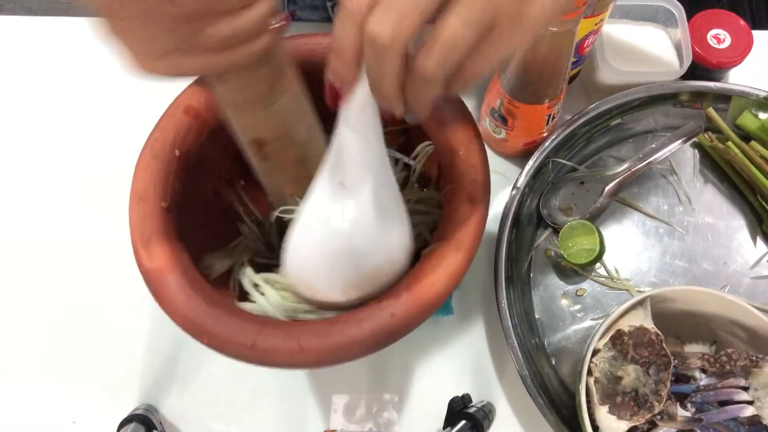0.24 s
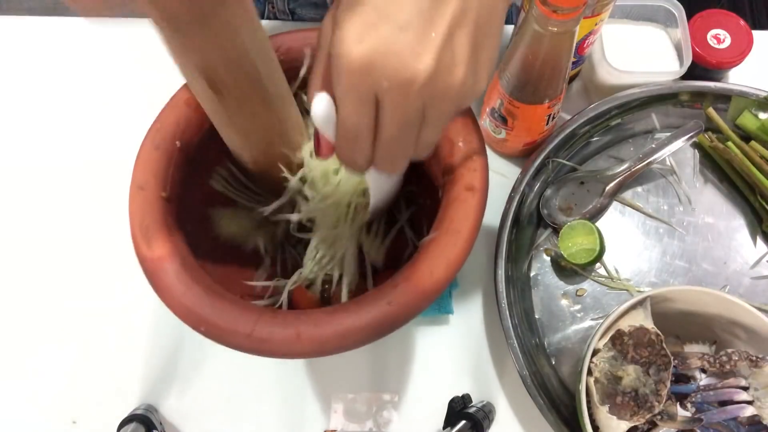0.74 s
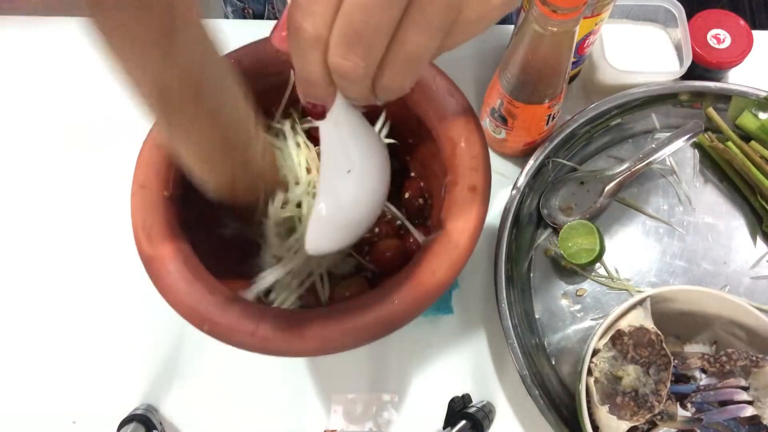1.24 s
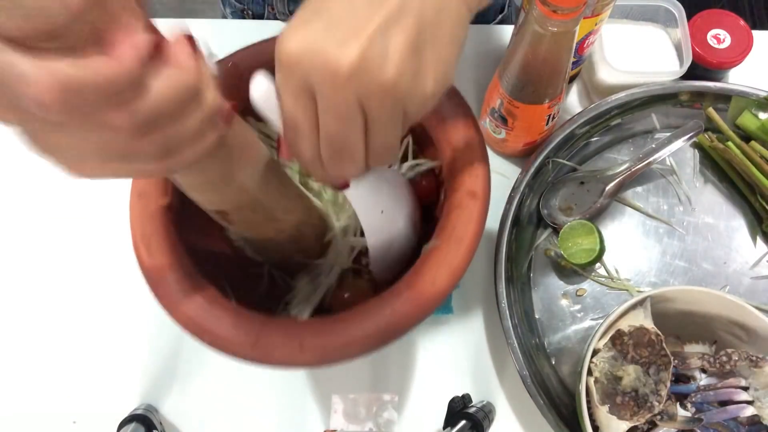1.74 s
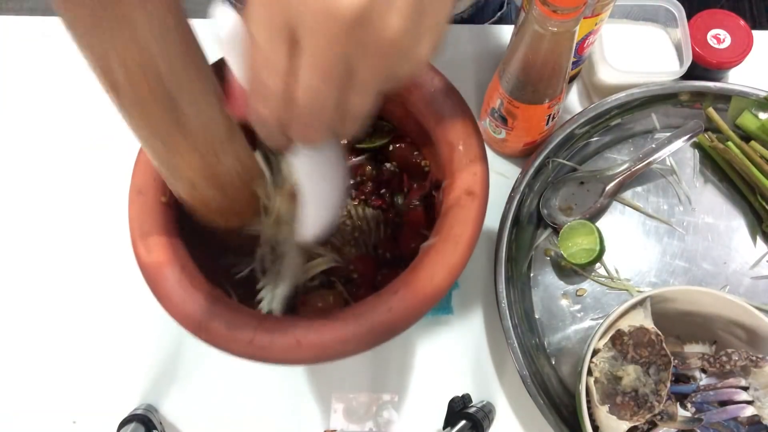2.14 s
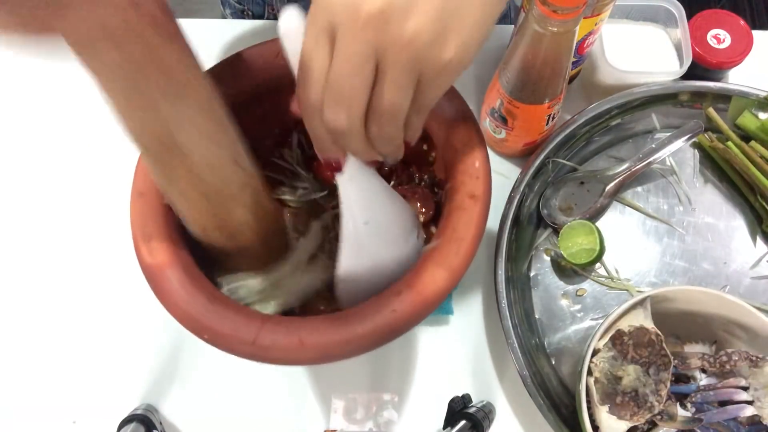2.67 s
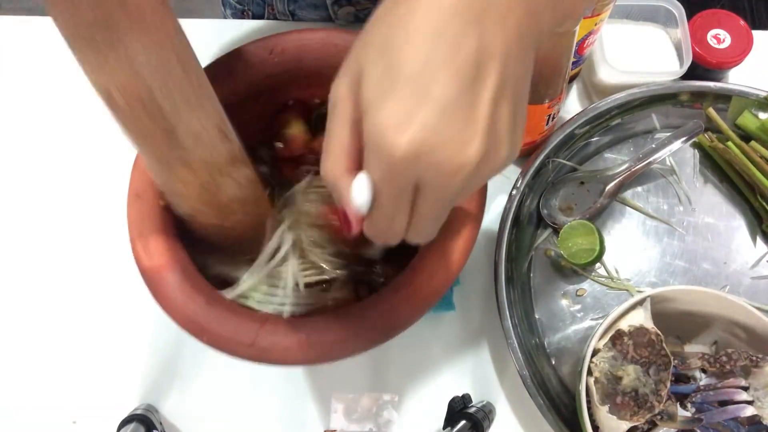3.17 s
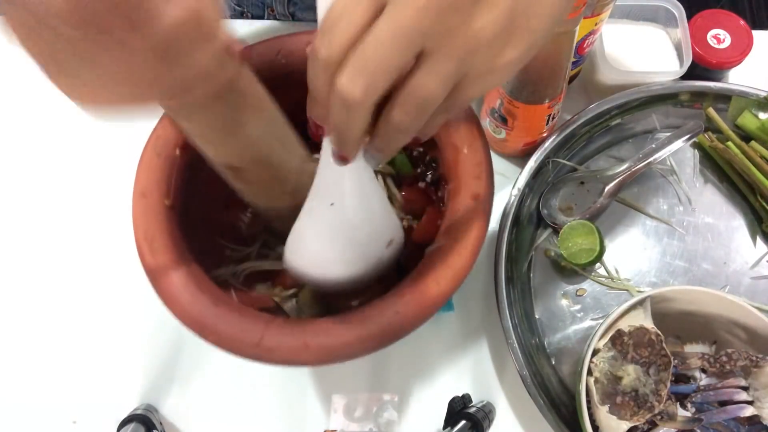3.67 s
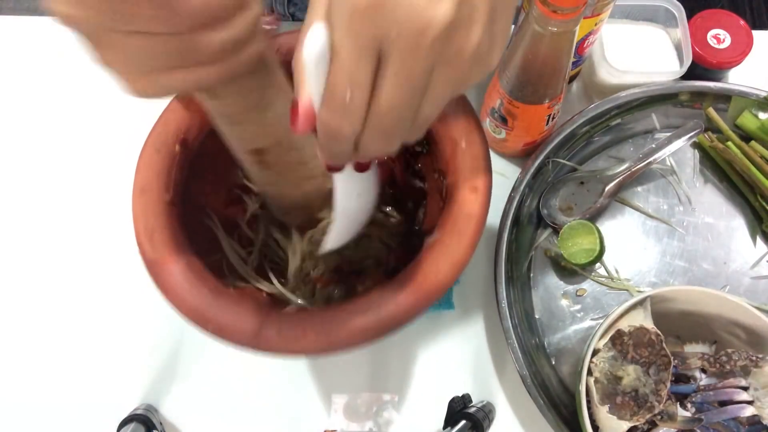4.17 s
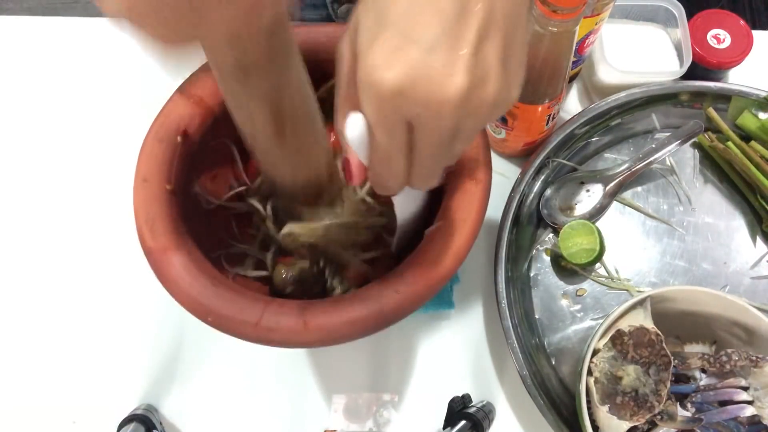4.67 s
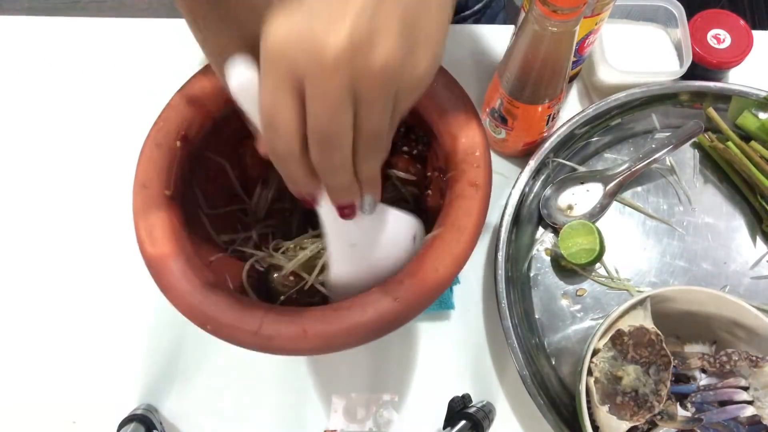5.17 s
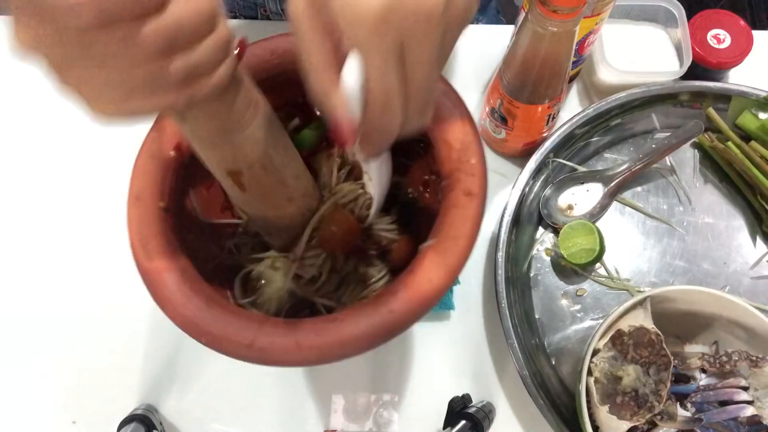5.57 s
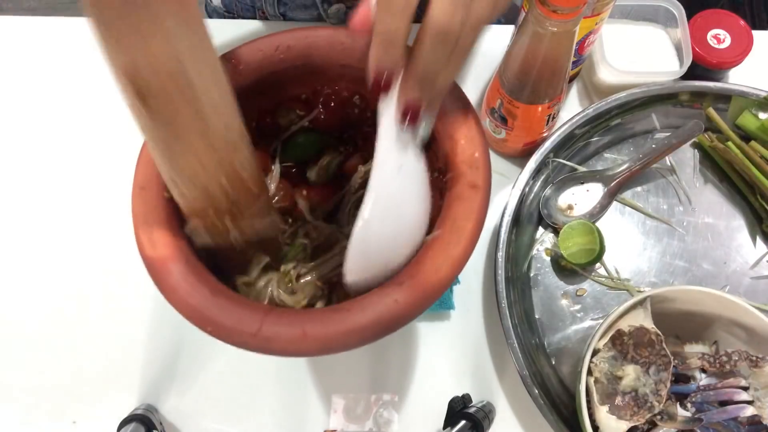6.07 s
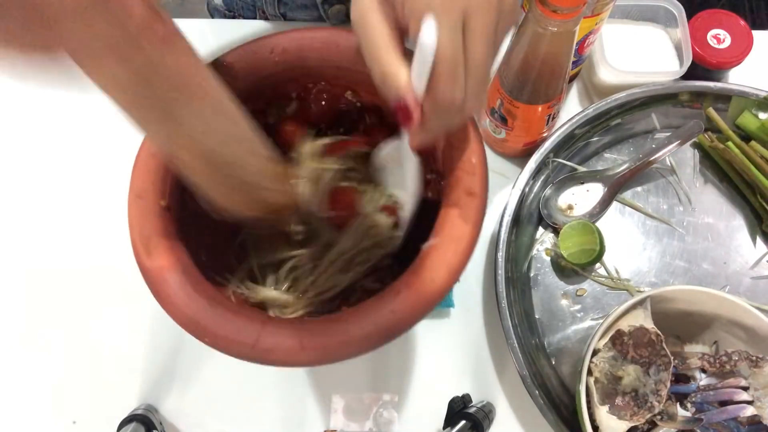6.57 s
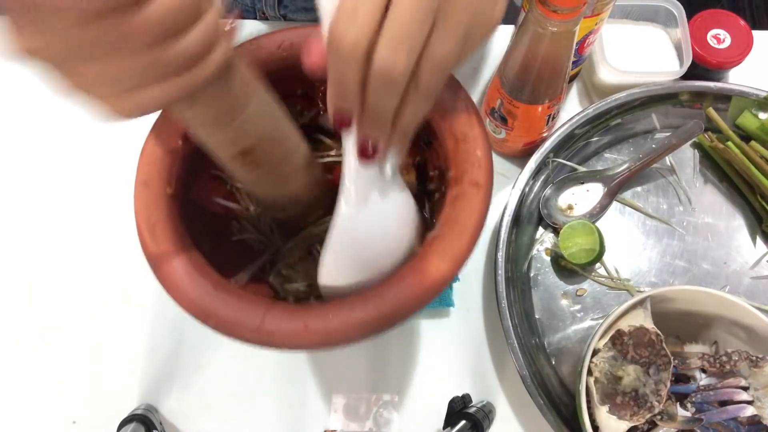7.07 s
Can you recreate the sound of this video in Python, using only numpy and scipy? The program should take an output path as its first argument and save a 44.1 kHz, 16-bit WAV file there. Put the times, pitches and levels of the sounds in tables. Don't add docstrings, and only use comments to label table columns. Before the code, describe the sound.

A close microphone hears a wooden pestle pounding wet shredded vegetable in a clay mortar, roughly three uneven pounds a second, each a swelling crunch with fine fizz and juicy squash. A spoon clack opens at 0.3 s. Rim knocks follow at 0.5, 0.8 and 1.1 s, the loudest at 1.7 s, making the clay ring around 1.1 kHz until touches damp it. A hollow knock comes at 2.25 s, a soft woody thud at 2.7 with little scrapes and squeals, and a firm knock at 3.3. From 3.5 to 4.4 s mostly squelchy pounding and light taps remain. Hard plastic clacks strike at 4.45, 5.15 and 6.15 s, a duller one at 5.9, with brief chirping scrapes near 5.2. A ringing woody blow lands at 6.7, then a heavy crunch and closing clack at 7.1. Short kitchen reflections and steady low hum with a faint far motor lie behind.

```python
import sys
import numpy as np
from scipy import signal
from scipy.fft import rfft, irfft, next_fast_len
from scipy.io import wavfile
from scipy.ndimage import uniform_filter1d, map_coordinates

SR = 44100
rng = np.random.default_rng(int(sys.argv[2]) if len(sys.argv) > 2 else 0)


def wav_record(signal):
    frames = np.transpose(np.atleast_2d(signal))
    bounded = np.clip(frames, -1, 1)
    quanta = np.round(bounded * 32767).astype(np.int16)
    wavfile.write(sys.argv[1], SR, quanta)


def boost_factor(decibels):
    exponent = np.asarray(decibels, float) / 20
    return 10 ** exponent


N = 322395


def along(points, hz):
    f, v = np.transpose(points)
    return np.interp(np.log(hz + 1), np.log(f + 1), v)


def coloured(x, spectrum):
    m = next_fast_len(len(x) + 8192)
    gain = boost_factor(along(spectrum, np.fft.rfftfreq(m, 1 / SR)))
    y = irfft(rfft(x, m) * gain, m)[:len(x)]
    return y / np.sqrt(np.mean(y ** 2))


def around(hz, wide, n):
    heap = [(hz / wide ** 7, -60), (hz / wide ** 3, -22), (hz / wide, -5), (hz, 0),
            (hz * wide, -5), (hz * wide ** 3, -22), (hz * wide ** 7, -60)]
    return coloured(rng.standard_normal(n), heap)


def above(x, hz):
    return signal.sosfilt(signal.butter(N=3, Wn=hz, btype="high", fs=SR, output="sos"), x)


def add(track, s, sound):
    part = track[round(s * SR):][:len(sound)]
    part += sound[:len(part)]


def rung(modes, t):
    luck_db = rng.normal(0, 1.5, len(modes))
    detune = rng.normal(0, .0007, len(modes))
    out = 0
    for (hz, db, t60), more_db, shift in zip(modes, luck_db, detune):
        out = out + boost_factor(db + more_db - 60 * t / t60) * np.sin(2 * np.pi * hz * (1 + shift) * t)
    return out


# (time [s], crunch level [dB], wetness [dB], fizz [dB], rise to gain 6 dB [s])
POUNDS = [(0.272, -38, -10, -13, .022), (0.888, -40.5, -5.5, -11, .027), (1.189, -38, 2, -11, .014),
          (1.495, -37, 3, -14, .026), (1.789, -38, -.6, -9.5, .025), (2.041, -39, -5, -12, .028),
          (2.531, -37.5, 1.5, -15, .022), (2.858, -41, -14, -11, .018), (3.094, -40.5, 3, -11, .025),
          (3.43, -39.5, -1.1, -11, .033), (3.688, -41, 2.5, -13, .034), (3.96, -38, 0, -7, .026),
          (4.229, -37, 1.1, -7, .02), (4.504, -38.5, 6, -5, .013), (5.068, -39, 5, -12, .017),
          (5.949, -41, 4, -10, .023), (6.012, -46, 9, -13, .0068), (6.526, -44, 3, -11, .009),
          (6.842, -36, 2, -9, .013), (7.121, -30, 0, -13, .008)]
# (time [s], crunch level
# [dB], wetness [dB], rise by 6 dB [s], fall by 6 dB [s])
STIRS = [(2.785, -38, -3, .005, .04), (6.46, -55, 3, .04, .03), (0.406, -50, -9, .029, .019),
         (0.607, -43, -8, .054, .031), (0.719, -55.5, -2.1, .07, .07), (1.245, -50.5, 2.1, .017, .041),
         (1.439, -48, -9, .01, .017), (1.618, -56, 1.1, .044, .0086), (2.063, -55, 11, .012, .013),
         (2.636, -56, 5.5, .022, .044), (2.83, -38, 1.5, .019, .045), (3.193, -54, 4, .018, .018),
         (4.018, -57, 13.5, .034, .013), (4.3, -59.5, 16, .039, .037), (4.606, -43, -11, .057, .024),
         (4.78, -42.5, -3, .012, .035), (4.919, -66, 14, .041, .02), (5.23, -55.5, 3, .018, .07),
         (5.316, -43, 3, .0084, .042), (5.43, -55.5, 2.1, .045, .068), (5.645, -44, 5, .014, .041),
         (6.258, -42, 0, .033, .032), (7.245, -51, -2, .015, .02)]
# (time [s], level [dB], wetness [dB])
RUSTLE = [(0, -48, -3), (.14, -68, 11), (.3, -50, 3), (.5, -47, 0), (1.2, -56, -3), (1.36, -68, 3),
          (1.6, -54, 0), (1.95, -52, -3), (2.4, -66, 3), (2.9, -51, 0), (4.25, -54, 0), (4.42, -61, 3),
          (5.27, -50, 0), (5.6, -60, 3), (6.1, -61, 3), (6.37, -50, -3), (6.7, -57, 4), (7.31, -46, -3)]


def pressure():
    def fizz_for(wet_db):
        return -10 - .5 * wet_db

    s, db, wet_db = np.transpose(RUSTLE)
    rustle_db = np.interp
    power = np.array([boost_factor(2 * rustle_db(np.arange(N) / SR, s, db - 6 + more))
                      for more in (0, fizz_for(wet_db), wet_db)])
    pound_fall_s = .014
    pounds = [(s, db, fizz_db, wet_db, rise, pound_fall_s) for s, db, wet_db, fizz_db, rise in POUNDS]
    stirs = [(s, db, fizz_for(wet_db), wet_db, rise, fall) for s, db, wet_db, rise, fall in STIRS]
    u = np.arange(-SR // 5, SR // 5) / SR
    for s, crunch_db, fizz_db, squash_db, rise, fall in pounds + stirs:
        away = np.abs(u) / np.clip(np.where(u < 0, rise, fall), .004, .07)
        swell = boost_factor(2 * (crunch_db - 7.25 * away ** 1.7))
        for row, more in zip(power, (0, fizz_db, squash_db)):
            add(row, s + u[0], boost_factor(2 * more) * swell)
    return np.sqrt(power)


def grains(rate, hz, octaves, cycles, spread_db, bed_db):
    when, pitch, size = rng.random((3, int(rate * N / SR)))
    f = np.minimum(hz * 2 ** (octaves * (2 * pitch - 1)), .4 * SR)[:, None]
    t = np.arange(int(np.clip(3 * cycles * SR / hz, 8, 400))) / SR
    tone = np.sin(2 * np.pi * f * t) * f * t * np.exp(-2 * f * t / cycles)
    strength = boost_factor(np.minimum(-spread_db * np.log(size + 1e-9), 18))[:, None]
    tone *= strength / np.linalg.norm(tone, axis=1, keepdims=True)
    at = (when * N).astype(int)[:, None] + np.arange(len(t))
    out = np.bincount(at.ravel(), tone.ravel(), N)[:N]
    return out / np.std(out) + boost_factor(bed_db) * rng.standard_normal(N)


# (pitch [Hz], level per Hz [dB])
CRUNCH = [(1500, -19), (2600, 3), (4000, 3.5), (6000, 1), (8000, -8.5), (12000, -46)]
# (pitch [Hz], level per Hz [dB])
FIZZ = [(4000, -18), (7000, 9.5), (10000, 5), (15750, 0), (16150, -58.5)]
# (pitch [Hz], level per Hz [dB])
SQUASH = [(250, -31), (450, -20.5), (600, 3.5), (800, -2), (1500, 2), (2400, 0), (3500, -9.5), (6000, -71)]


def crush():
    snags = map_coordinates(rng.standard_normal(N // 250 + 4), [np.arange(N) / 250])
    crunch = grains(rate=1700, hz=4226, octaves=.9, cycles=2.5, spread_db=5.5, bed_db=6.5)
    fizz = grains(rate=3000, hz=9340, octaves=.83, cycles=2.8, spread_db=4, bed_db=-2)
    squash = grains(rate=900, hz=1300, octaves=1.376, cycles=2.38, spread_db=2, bed_db=3)
    layers = [boost_factor(2.5) * coloured(crunch, CRUNCH),
              boost_factor(5) * coloured(fizz, FIZZ),
              boost_factor(2.5) * coloured(squash, SQUASH)]
    return boost_factor(2.24 * snags) * np.sum(pressure() * layers, axis=0)


def patchy(x, depth_db):
    z = signal.stft(x, nperseg=256)[2]
    field = uniform_filter1d(rng.standard_normal(z.shape), size=5, axis=0)
    field = uniform_filter1d(field, size=5, axis=1)
    gain = boost_factor(depth_db * field / np.std(field) - depth_db ** 2 / 9)
    return signal.istft(z * gain, nperseg=256)[1][:N]


# (pitch [Hz], level [dB], t60 [s])
HOLLOW = [(353, -25, .25), (410, -23, .3), (550, -11, .16), (610, -9, .07), (660, 0, .022), (840, -9, .025)]


def hollow(t):
    return rung(HOLLOW, t) + boost_factor(-11 - 60 * t / .12) * around(565, 1.26, len(t))


# (pitch [Hz], level [dB], t60 [s])
KNOCK = [(872, -4, .05), (960, -2, .025), (1303, 1, .022)]
# (time [s], peak level [dB], thud [dB], knock [dB], crack [dB]), last three re peak
STRIKES = [
    (0.506, -9.5, -6, -10, -6),
    (0.798, -5, -11.5, -24, -17),
    (1.097, -9, -8.5, -12, -6),
    (1.408, -29, -.6, -15, -13),
    (1.565, -23, 2, -16, -8),
    (1.684, 3, -15.5, -19, -11),
    (2.25, -11.5, -8, -13.5, -15),
    (2.721, -19.5, -3, -8.5, -22),
    (3.28, -6, -13, -10, -17),
    (6.732, -5, -13, -6, -9),
]


def strikes():
    out, t = np.zeros(N), np.arange(SR // 3) / SR
    for s, db, thud_db, knock_db, crack_db in STRIKES:
        wood = rung([(1640, 3, .012), (2050, 1.5, .0098), (2420, -4.5, .0072)], t)
        wood += .6 * boost_factor(-60 * t / .018) * around(1700, 1.43, len(t))
        splinter = boost_factor(-24 - 60 * t / .02) * around(4100, 1.25, len(t))
        crack = boost_factor(crack_db + 4) * (wood + splinter)
        body = boost_factor(knock_db + 6.5) * rung(KNOCK, t) + boost_factor(thud_db) * hollow(t)
        crack *= (1 - np.exp(-t / .0003)) ** 2
        body *= (1 - np.exp(-t / .0008)) ** 2
        add(out, s - .0003, boost_factor(db) * (crack + body))
    return out


# (time [s], pressed ring [dB], free ring [dB], split twin [dB], upper modes [dB])
RING = [(.282, -70, -42, -50, -29), (.353, -70, -41, -50, -55), (.507, -16, -26.5, -30, -29),
        (.799, -30, -10.5, -22, -26), (.872, -30, -27, -40, -50), (1.098, -30, -10.5, -19, -30),
        (1.41, -60, -36, -48, -48), (1.566, -60, -31, -44, -55), (1.685, -30, -9, -17, -18),
        (1.9, -70, -45, -60, -70), (2.251, -50, -14, -26, -31), (2.652, -70, -60, -70, -52),
        (2.671, -70, -43, -55, -65), (2.722, -60, -28, -40, -52), (3.282, -11, -26, -26, -30),
        (3.404, -60, -32, -40, -45), (4.45, -60, -33, -45, -22), (5.145, -60, -32, -45, -21),
        (5.246, -70, -38, -50, -60), (6.159, -50, -20.5, -32, -20), (6.257, -60, -45, -50, -36),
        (6.733, -9, -22, -24, -26), (7.116, -60, -31, -42, -28)]
# (time [s], loss of ring [dB])
TOUCHES = [(.335, 12), (.39, 6), (.66, 14), (.85, 22), (.93, 11), (1.0, 11), (1.185, 18), (1.44, 8),
           (1.64, 8), (1.76, 9), (1.826, 22), (1.97, 12), (2.268, 13), (2.52, 9), (2.77, 14), (3.425, 9),
           (3.53, 11), (4.51, 6), (4.59, 12), (5.18, 7), (5.29, 11), (6.2, 5), (6.265, 10), (6.385, 10),
           (6.88, 9), (6.99, 8), (7.15, 8)]


def wall():
    wall_hz, choke_s = 1090.5, .034
    free_db_per_s, held_db_per_s = 30, 60
    pressed_hz, pressed_t60_s = 2.5, .17
    split_hz, split_t60_s = 20, .15
    level, t = np.zeros(N, complex), np.arange(SR // 2) / SR
    for s, pressed_db, free_db, split_db, _ in RING:
        later = [(when - s, db) for when, db in TOUCHES if when > s]
        loss_db = sum(db * np.clip((t - after) / choke_s + .5, 0, 1) for after, db in later[:4])
        held_db = held_db_per_s * np.maximum(t - later[0][0], 0)
        free = boost_factor(free_db - free_db_per_s * t - held_db - loss_db)
        pressed = boost_factor(pressed_db - 60 * t / pressed_t60_s) * np.exp(2j * np.pi * pressed_hz * (t - .05))
        split = boost_factor(split_db - 60 * t / split_t60_s - loss_db) * np.exp(2j * np.pi * split_hz * t)
        add(level, s - .001, np.minimum(t / .002, 1) * (free - pressed + split))
    drift = np.cumsum(uniform_filter1d(rng.standard_normal(N), size=400)) * .012
    return np.imag(level * np.exp(1j * (2 * np.pi * wall_hz * np.arange(N) / SR + drift)))


# (pitch [Hz], level [dB], t60 [s])
UPPER = [(2806, -5, .17), (2826, 5, .055), (2880, -3, .03), (2570, -3, .05), (2160, -14, .05)]


def chime():
    out, t = np.zeros(N), np.arange(SR // 3) / SR
    for s, *_, upper_db in RING:
        add(out, s - .0005, boost_factor(upper_db) * (1 - np.exp(-t / .0005)) * rung(UPPER, t))
    return out


# (pitch [Hz], level per Hz [dB])
EDGE = [(2000, -65), (5000, -5), (10000, -2), (16000, 5.5)]
# (pitch [Hz], level [dB], t60 [s])
TOP = [(3700, 3, .015), (4780, -3, .04), (5760, -2, .05), (5950, 14, .012), (7870, -9, .06),
       (7960, 14, .011), (8900, 5, .015), (10400, 8, .008), (11800, 2, .008)]
# (time [s], peak level [dB], thud re peak [dB], top ring re peak [dB], crack pitch [Hz])
CLACKS = [
    (0.282, -12, -16, -36, 2330),
    (2.652, -42, -20, 0, 2750),
    (4.45, -4.5, -21, -27, 2500),
    (5.145, -1, -28, -31, 2550),
    (5.892, -7.5, -14, -45, 1550),
    (6.1595, -2, -14, -24, 2300),
    (6.258, -20, -25, -7, 2600),
    (7.116, -8, -24, -25, 2550),
]


def clacks():
    out, t = np.zeros(N), np.arange(SR // 5) / SR
    for s, db, thud_db, top_db, hz in CLACKS:
        snap = rung([(hz, 3, .005), (hz * .8, -1, .009), (hz * 1.3, -9, .005)], t)
        crack = (boost_factor(-8 - 60 * t / .009) + boost_factor(-16 - 60 * t / .035)) * around(hz, 1.35, len(t))
        click = boost_factor(10 - 60 * t / .011) * coloured(rng.standard_normal(len(t)), EDGE)
        top = boost_factor(top_db) * (rung(TOP, t) + click)
        thud = boost_factor(thud_db + 2 - 60 * t / .15) * (1 - np.exp(-t / .001)) * hollow(t)
        add(out, s - .001, boost_factor(db) * (1 - np.exp(-t / .0003)) * (snap + crack + top + thud))
    return out


# (time [s], peak level [dB],
# pitch [Hz], t60 [s])
TAPS = [(0.873, -27, 2170, .025), (0.8891, -21.5, 2050, .03), (1.2385, -28, 1550, .021),
        (1.7889, -16.5, 2800, .016), (2.143, -36, 3610, .022), (2.509, -20, 4700, .015),
        (2.78, -26, 2870, .03), (3.2056, -36.5, 3750, .021), (3.4035, -12, 1700, .015),
        (3.404, -21, 5900, .02), (3.6426, -34, 1620, .03), (3.7632, -35, 3200, .018),
        (0.055, -35, 1550, .015), (4.2273, -19.5, 3500, .015), (4.289, -25, 1950, .01),
        (4.319, -25, 1020, .025), (4.4973, -19.5, 1850, .022), (4.871, -28, 964, .03),
        (4.7686, -26, 1870, .034), (5.3098, -26, 1450, .04), (5.9295, -20, 5000, .016),
        (5.949, -15, 5300, .014), (6.014, -15, 1600, .025), (0.282, -17, 5800, .018),
        (6.3655, -16, 2510, .02), (6.378, -22.5, 2520, .011), (6.5235, -26, 1610, .025),
        (0.271, -26, 4500, .012), (0.275, -24, 5000, .008), (1.189, -24, 2400, .015),
        (2.016, -32, 3680, .015), (2.81, -26, 3200, .02), (4.149, -30, 1480, .03), (4.5, -22, 7500, .012),
        (4.507, -19, 1250, .015), (4.565, -30, 1700, .02), (5.029, -36, 1290, .015),
        (5.917, -27, 3200, .015), (5.937, -22, 1800, .015), (6.008, -22, 5400, .015),
        (6.3605, -24, 2050, .014), (6.454, -33, 2010, .014), (0.2825, -18, 3750, .025),
        (6.479, -31, 1600, .018), (6.503, -31, 1910, .015), (6.521, -26, 3100, .012),
        (6.711, -36, 1350, .02), (6.8405, -18, 1430, .025), (6.837, -20, 1880, .025)]
# (time [s], peak level [dB], thud re peak [dB], edge re peak [dB])
BUMPS = [(0.353, -21, -3, -18), (0.367, -33, 3, -25), (2.67, -46, 8, -20), (5.245, -40, 6, -20),
         (5.046, -36, 4, -20), (5.93, -30, 3, -20), (5.95, -28, 1, -20), (6.251, -34, 10, -20),
         (6.381, -46, 10, -20), (6.479, -46, 10, -20), (6.542, -36, 4, -20), (6.551, -40, 8, -20),
         (6.572, -44, 10, -20), (1.147, -30, 8, -30), (3.661, -36, 4, -20), (1.1789, -20, 13.5, -24),
         (1.7531, -19, 8.5, -16), (1.7968, -28, 12, -15), (2.5267, -29, -10, -17), (2.7057, -46, 14, 0),
         (2.7324, -32, 5, -5), (3.0974, -35, -2, -4), (3.9394, -29, -7, .6), (4.2083, -38, -13, -18),
         (4.3186, -31, -4, -30), (4.5052, -35, -10, -21), (4.782, -36, -22, 4.5), (4.87, -33, -6, -30),
         (5.0631, -36, -9, -3.5), (5.2768, -34, 4.5, -11), (5.4265, -31.5, -4, -26),
         (5.6186, -37, -24, -2.1), (5.7149, -21, -8, -35), (7.112, -18, -15, -15), (7.121, -18, -12, -15),
         (7.152, -36, 10, -20), (7.243, -30, -15, -20), (4.303, -30, -12, -20), (4.8, -34, 4, -10),
         (4.54, -38, 8, -20), (3.878, -36, -10, -20), (4.001, -34, -2, -20), (6.839, -26, 4, -15),
         (7.2399, -37.5, 1.1, 4.5)]


def knocks():
    out, t = np.zeros(N), np.arange(SR // 11) / SR
    tap_thud_db, tap_edge_db = -24, -24
    bump_hz, bump_t60_s = 1650, .024
    taps = [(s, db, hz, tap_thud_db, tap_edge_db, t60) for s, db, hz, t60 in TAPS]
    bumps = [(s, db, bump_hz, thud_db, edge_db, bump_t60_s) for s, db, thud_db, edge_db in BUMPS]
    for s, db, hz, thud_db, edge_db, t60 in taps + bumps:
        click = boost_factor(edge_db) * coloured(rng.standard_normal(len(t)), EDGE)
        tone = .64 * np.sin(2 * np.pi * hz * t) + .4 * around(hz, 1.3, len(t))
        burst = boost_factor(1 - 60 * t / max(t60, .005)) * (tone + click)
        thud = boost_factor(thud_db - 60 * t / .091) * (1 - np.exp(-t / .0012)) * hollow(t)
        onset = (1 - np.exp(-t / .0003)) ** 2
        add(out, s - .0005, boost_factor(db) * onset * (burst + thud))
    return out


# (pitch [Hz], level [dB], t60 [s])
SUNG = [(2815, -8, .03), (3900, -12, .01), (5750, 0, .02), (6200, -5, .01), (8560, -9, .01),
        (10330, -13, .008), (11900, -10, .008)]
# (time [s], length [s], first level [dB], last level [dB])
RUB = [
    (.385, .05, -51, -48),
    (2.689, .03, -52, -54),
    (2.724, .015, -50, -50),
    (2.795, .04, -48, -50),
    (2.84, .075, -44, -54),
    (5.16, .06, -54, -54),
    (5.227, .009, -42, -42),
    (5.243, .006, -44, -46),
    (5.254, .026, -48, -50),
    (6.265, .04, -48, -50),
]


def rub():
    level = np.zeros(N)
    for s, length, first_db, last_db in RUB:
        add(level, s, boost_factor(np.linspace(first_db, last_db, round(length * SR))))
    slips = (rng.random(N) < 1200 / SR) * rng.standard_normal(N)
    body = rung(SUNG, np.arange(SR // 10) / SR)
    return boost_factor(3) * signal.fftconvolve(level * slips / np.std(slips), body / np.linalg.norm(body))[:N]


# (time [s], peak level [dB], pitch [Hz])
THUMPS = [
    (2.519, -46, 179),
    (3.898, -46, 260),
    (3.929, -46, 340),
]


def thumps():
    out, t = np.zeros(N), np.arange(SR // 10) / SR
    for s, db, hz in THUMPS:
        push = boost_factor(db + 4.5 - 60 * t / .096) * (1 - np.exp(-t / .0044))
        add(out, s - .005, push * around(hz, 1.48, len(t)))
    return out


# (pitch [Hz], t60 [s])
KITCHEN = [(200, 0.61), (1000, 0.42), (4000, 0.11), (12000, 0.41)]


def kitchen(x):
    hz, t, z = signal.stft(rng.standard_normal(SR // 2), SR, nperseg=256)
    tail = signal.istft(z * boost_factor(-60 * t / along(KITCHEN, hz)[:, None]), SR, nperseg=256)[1]
    return signal.fftconvolve(np.pad(x, (250, 0)), tail / np.linalg.norm(tail))[:N]


# (pitch [Hz], level per Hz [dB])
HUM = [(15, -35.5), (30, -21), (55, -0.5), (130, -2.5), (260, -5.5), (450, -10), (620, -14.5), (900, -20),
       (1600, -19.5), (3000, -39.5), (8000, -36), (10000, -38.5), (16400, -40)]
# (pitch [Hz], level [dB])
MOTOR = [(141, -67)]


def hum():
    out = boost_factor(-60.5) * coloured(rng.standard_normal(N), HUM)
    for hz, db in MOTOR:
        out += boost_factor(db) * around(hz, 1.003, N)
    return out


def scene():
    shreds = patchy(crush() + rub(), depth_db=2.6)
    blows = above(strikes() + knocks(), 190) + above(clacks(), 470) + chime()
    room = kitchen(boost_factor(-17) * blows + boost_factor(-11) * shreds)
    return (shreds + blows + wall() + thumps() + room + hum())[None]


def band_limit(x):
    return signal.sosfilt(signal.butter(12, 16790, fs=SR, output="sos"), x)


def record(dry):
    x = above(dry, 50)
    x = x / (1 + np.abs(x) ** 8) ** (1 / 8)
    x = signal.sosfilt(signal.cheby2(N=12, rs=45, Wn=16400, fs=SR, output="sos"), x)
    return band_limit(x)


dry = scene()
out = record(dry)
wav_record(out)
```